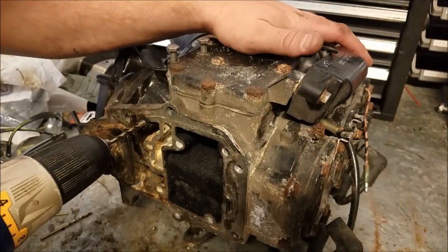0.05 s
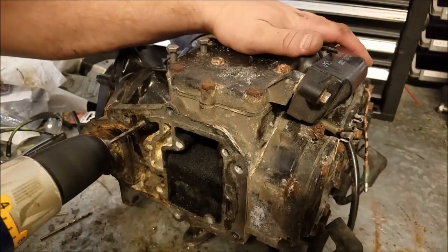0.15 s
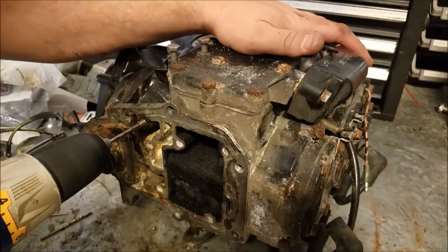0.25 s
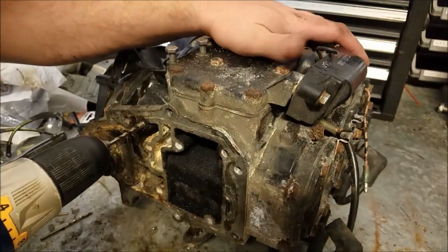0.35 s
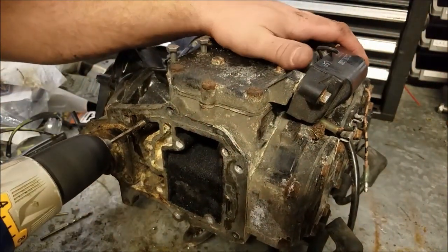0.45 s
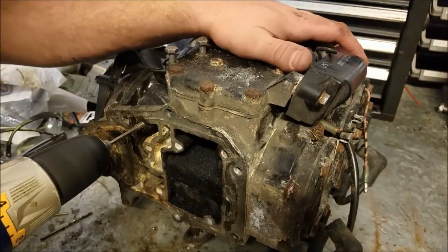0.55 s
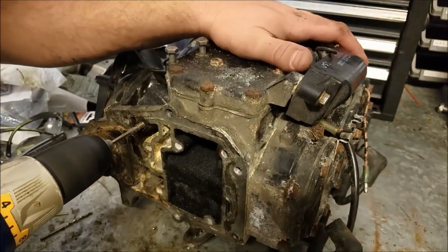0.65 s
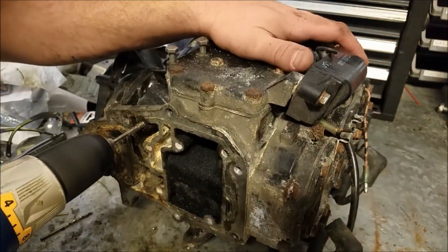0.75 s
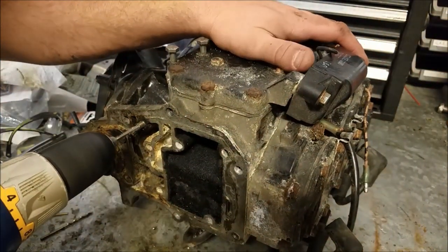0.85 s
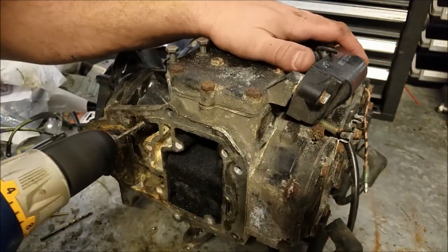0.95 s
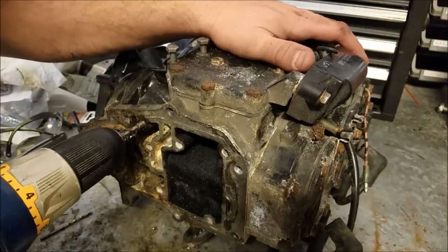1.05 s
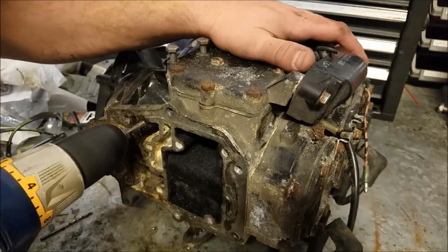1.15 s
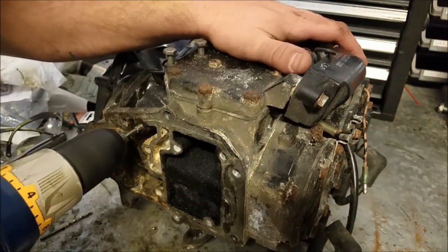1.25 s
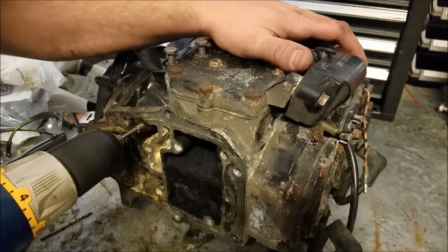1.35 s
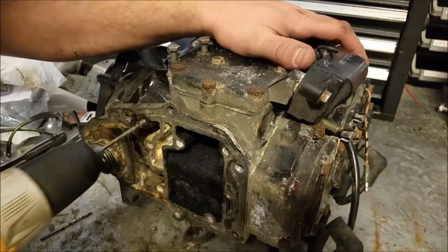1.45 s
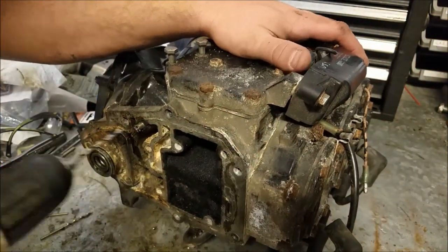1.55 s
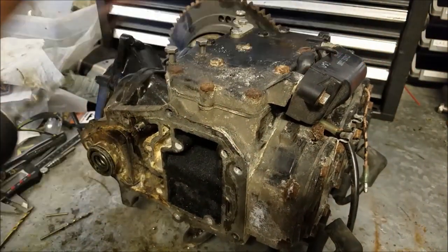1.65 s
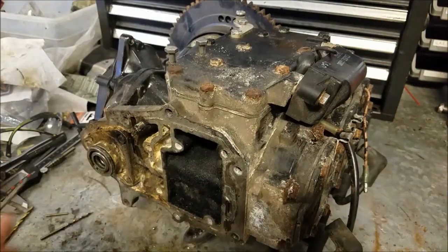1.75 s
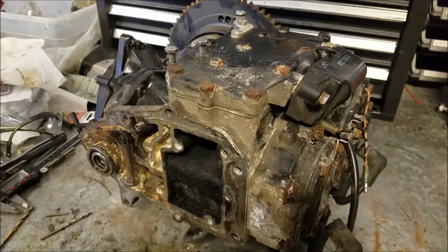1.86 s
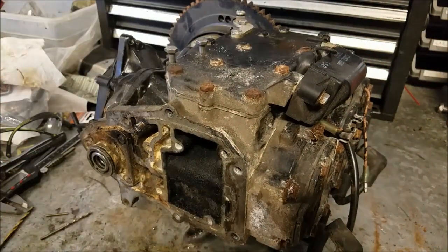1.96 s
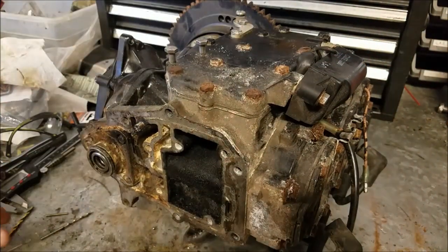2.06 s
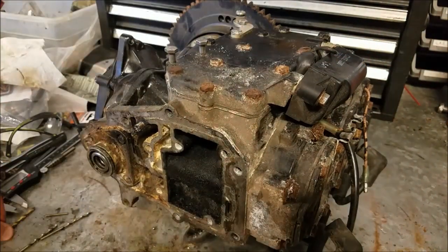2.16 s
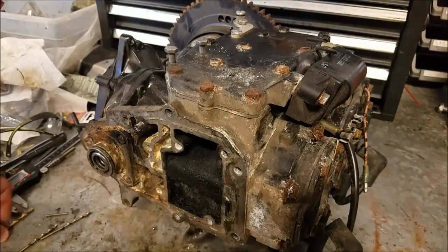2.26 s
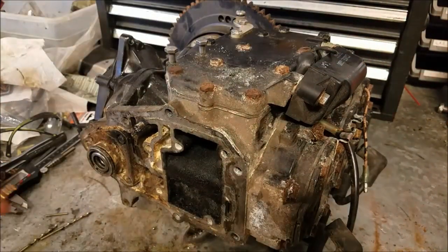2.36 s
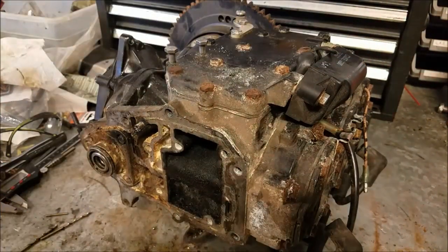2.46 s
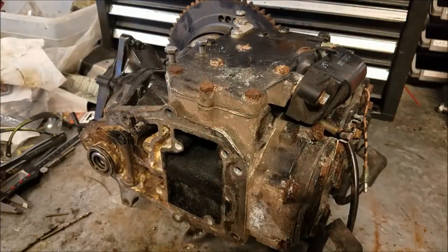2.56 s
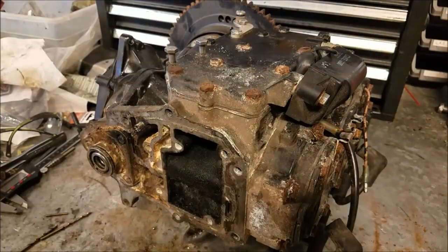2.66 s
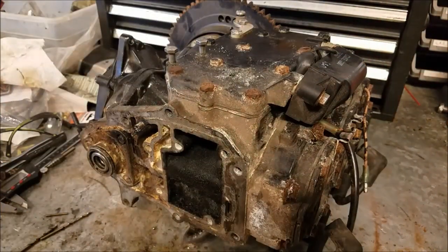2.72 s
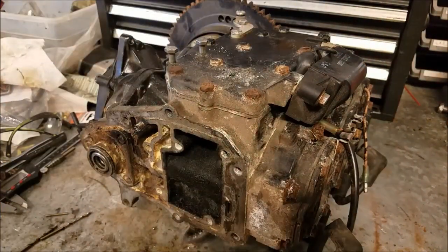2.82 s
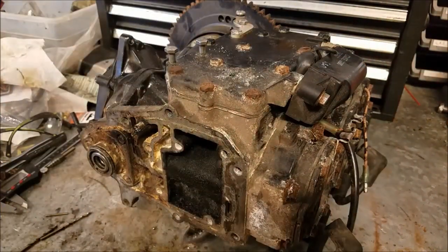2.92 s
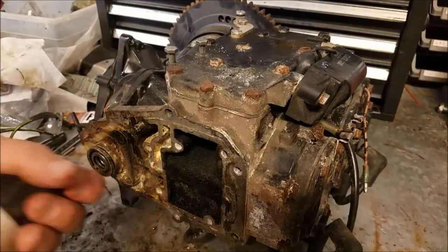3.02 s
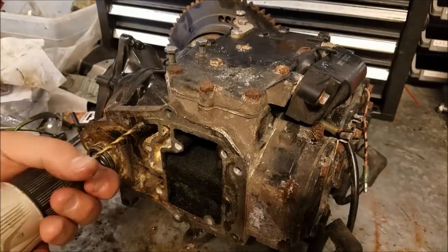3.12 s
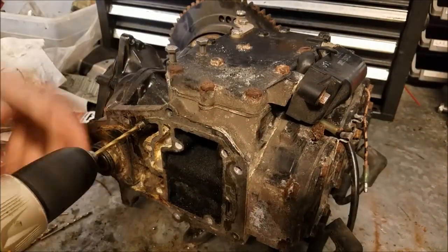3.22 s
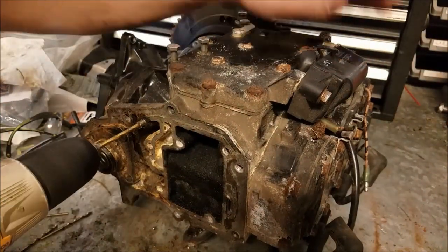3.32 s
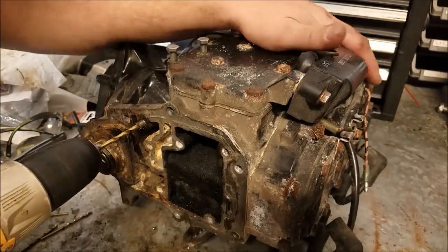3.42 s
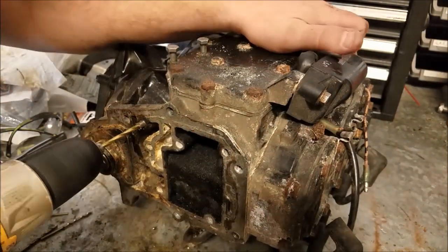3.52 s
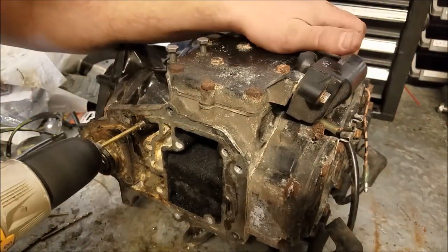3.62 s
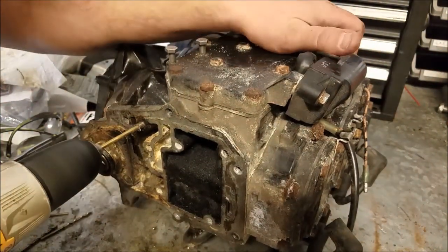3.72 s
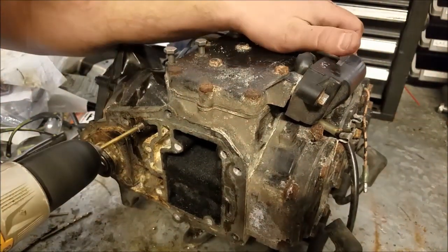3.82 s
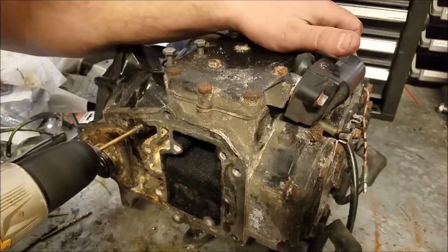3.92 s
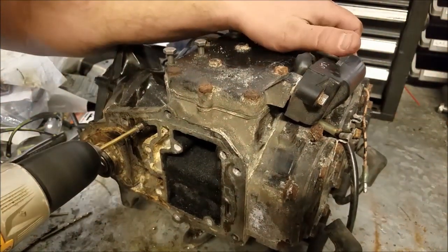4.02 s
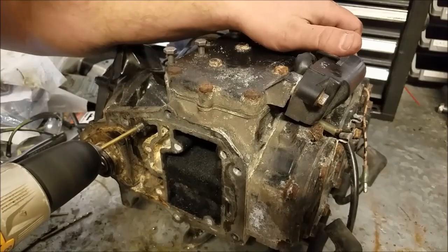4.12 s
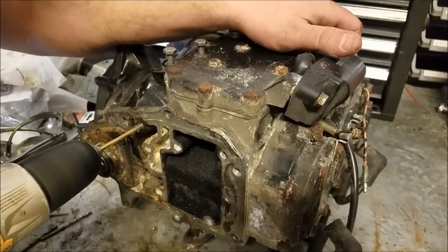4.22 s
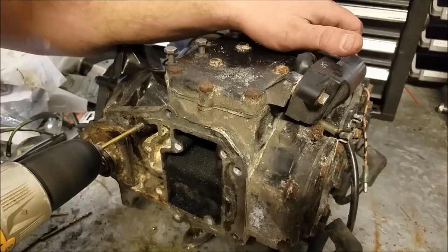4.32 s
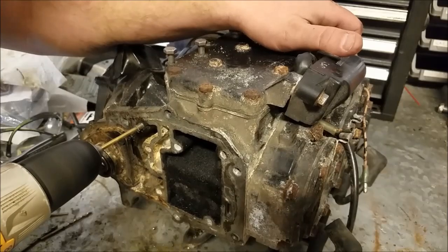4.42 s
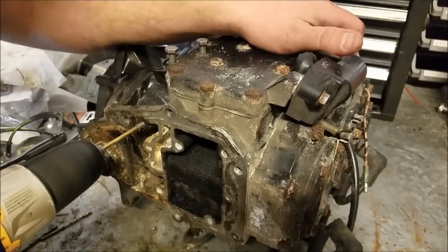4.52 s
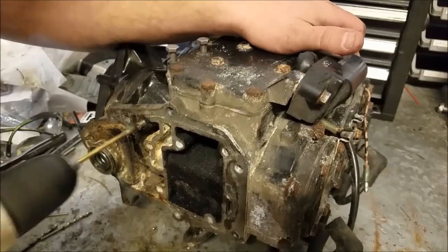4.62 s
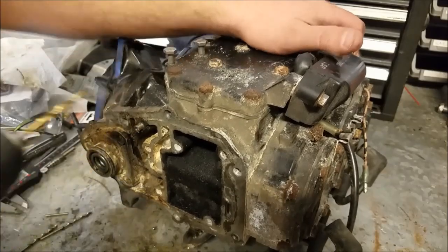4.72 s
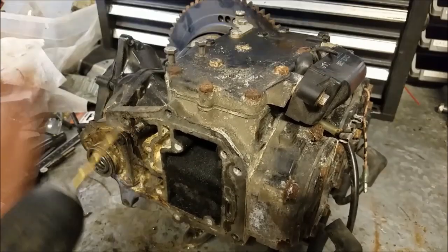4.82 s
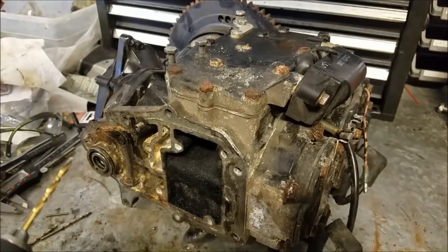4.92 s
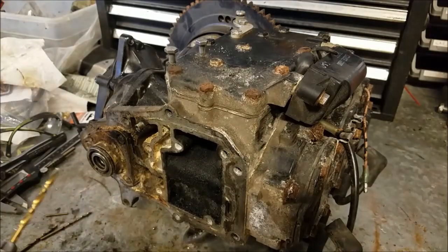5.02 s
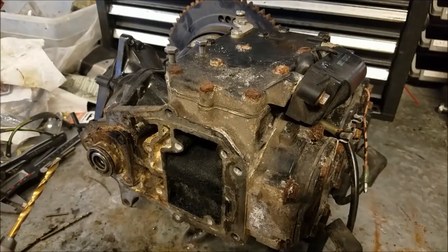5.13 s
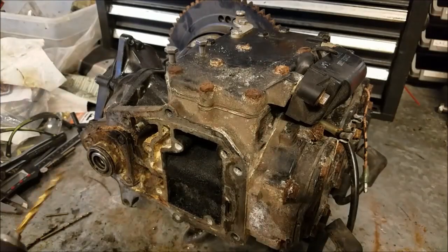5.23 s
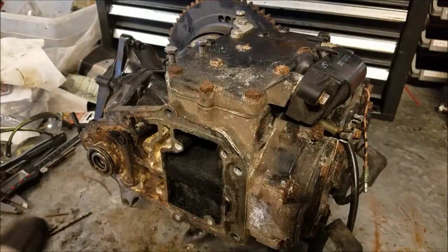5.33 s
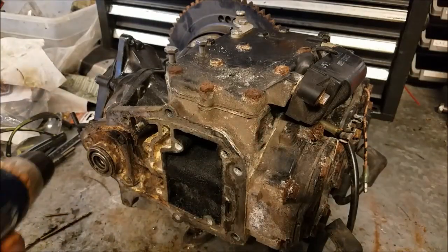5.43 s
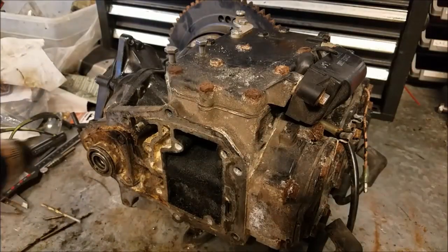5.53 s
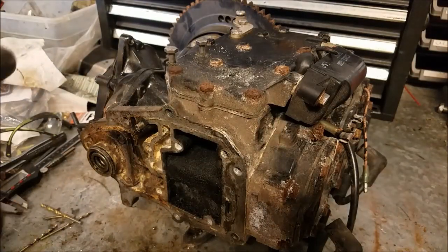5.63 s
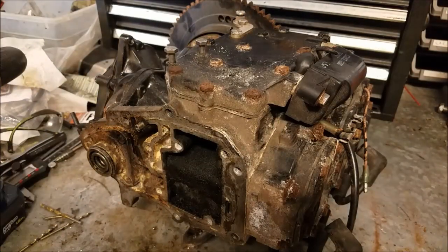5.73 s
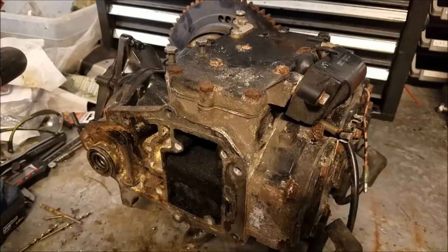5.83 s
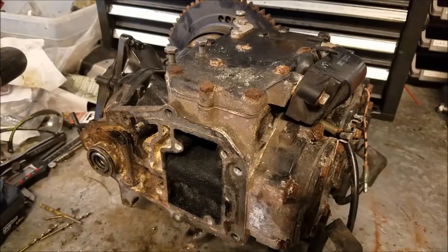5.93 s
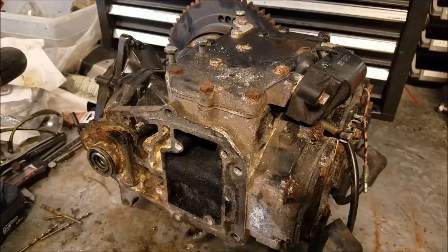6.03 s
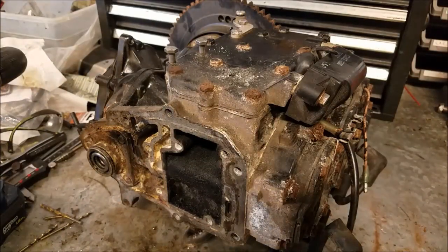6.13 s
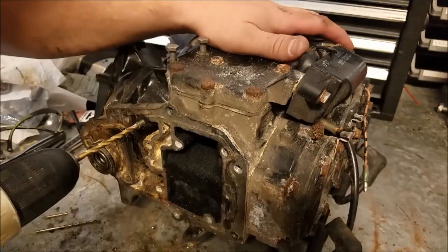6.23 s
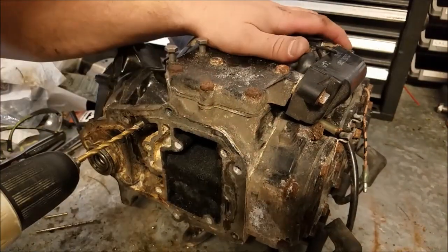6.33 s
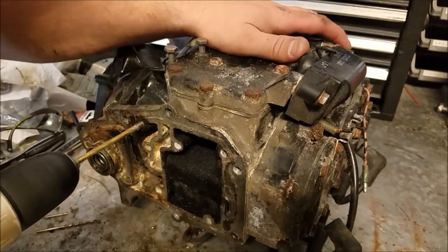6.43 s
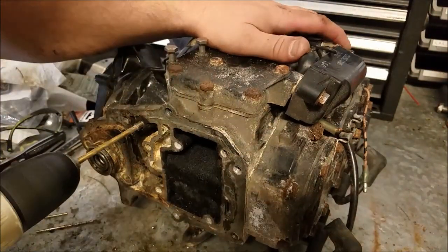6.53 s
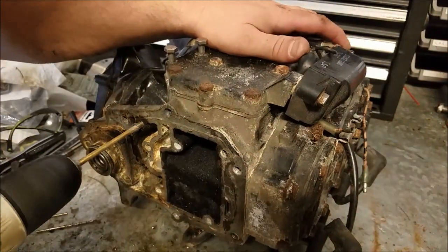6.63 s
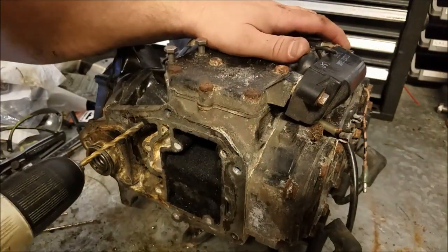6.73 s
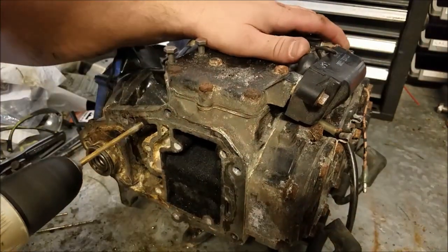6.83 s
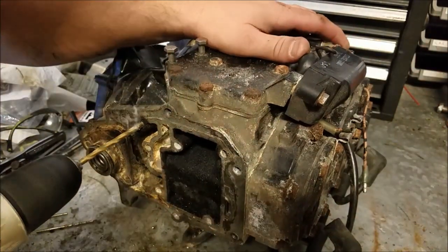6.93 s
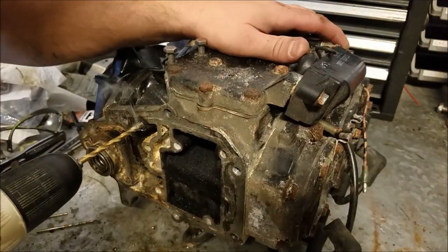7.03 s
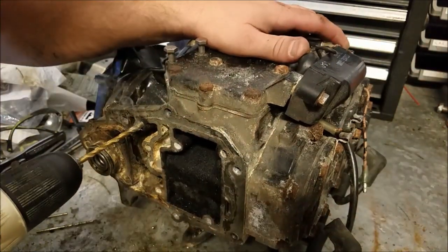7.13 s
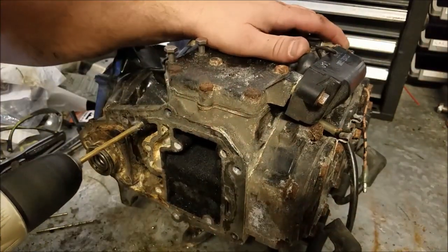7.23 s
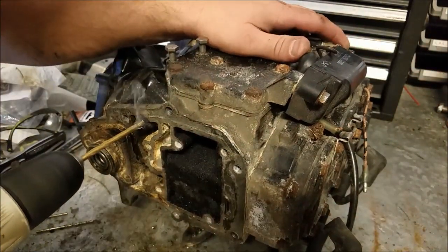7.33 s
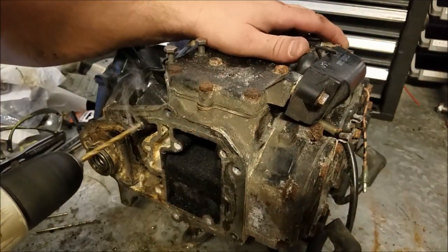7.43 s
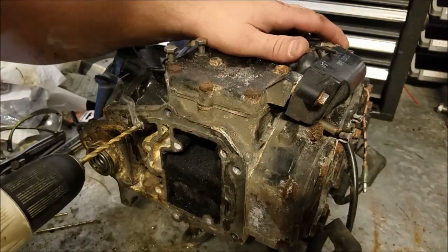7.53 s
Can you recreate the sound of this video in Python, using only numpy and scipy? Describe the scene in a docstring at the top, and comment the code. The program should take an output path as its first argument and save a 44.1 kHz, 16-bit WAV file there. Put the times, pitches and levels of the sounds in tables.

```python
"""Cordless drill in a garage

A drill works into a cast metal housing close to a two-port microphone. In each burst the motor and
gear teeth whine at multiples of the shaft speed, the gears rasp and the bit excites the resonances
of the casting. Trigger, clutch and bit click, and the tool knocks on the bench. Behind it a fan hums,
an engine revs past outside and a short hoot sounds."""
import sys
import numpy as np
from scipy import signal
from scipy.fft import rfft, irfft, next_fast_len
from scipy.io import wavfile
from scipy.ndimage import uniform_filter1d

SR = 44100
rng = np.random.default_rng(int(sys.argv[2]) if len(sys.argv) > 2 else 0)


def inscribe(sig):
    """Save sig as 16-bit PCM at rate SR to the path in sys.argv[1].

    A 1-D sig is mono; a 2-D sig holds one channel per row.
    Samples are clipped to [-1, 1] before scaling.
    """
    pcm = np.round(np.clip(np.atleast_2d(sig).T, -1, 1) * 32767)
    wavfile.write(sys.argv[1], SR, pcm.astype(np.int16))


N = 333837
T = np.arange(N) / SR


def undb(db):
    """Amplitude ratio of a level in dB."""
    return 10 ** (np.asarray(db) / 20)


def level(x, db=0):
    """Scaling to an rms level."""
    return x * undb(db) / np.sqrt(np.mean(x ** 2))


def butter(x, order, hz, kind="low", apply=signal.sosfilt):
    """Maximally flat filter, causal by default."""
    return apply(signal.butter(order, hz, kind, fs=SR, output="sos"), x)


def colour(x, points):
    """Spectral shaping by (f/Hz, level/dB) points on a logarithmic frequency axis."""
    hz, db = np.transpose(points)
    size = next_fast_len(N)
    f = np.maximum(np.arange(size // 2 + 1) * SR / size, 1)
    gain = undb(np.interp(np.log(f), np.log(hz), db, left=-70, right=-70))
    return irfft(rfft(x, size) * gain, size)[..., :N]


def resonate(x, hz, width_hz):
    """Forced response of a two-pole resonator, scaled to unit rms."""
    return level(signal.lfilter(*signal.iirpeak(hz, hz / width_hz, fs=SR), x))


def walk(rate):
    """Slow random fluctuation: values held for 1 / rate s and smoothed twice; spread near 1."""
    k = int(SR / rate)
    steps = np.repeat(rng.standard_normal(N // k + 1), k)
    return 1.256 * uniform_filter1d(uniform_filter1d(steps, k), k)[:N]


def envelope(tables, column):
    """Amplitude envelope from one level column of timed tables; silent outside them."""
    out = np.zeros(N)
    for rows in map(np.array, tables):
        on = (T >= rows[0, 0]) & (T <= rows[-1, 0])
        out[on] = undb(np.interp(T[on], rows[:, 0], rows[:, column]))
    return uniform_filter1d(out, size=88)


def ring(modes):
    """Impulse response as a sum of damped modes, peak 1."""
    t = np.arange(int(.12 * SR)) / SR
    y = sum(undb(db - 60 * t / t60) * np.sin(2 * np.pi * hz * t) for hz, db, t60 in modes)
    return y / np.abs(y).max()


def add(out, s, x):
    """Superposition of a short sound at time s."""
    i = int(s * SR)
    out[i:i + len(x)] += x[:len(out) - i]


def grit(scatter_db):
    """Impulsive noise: dense tiny impacts of uneven size."""
    return rng.standard_normal(N) * undb(scatter_db * np.minimum(rng.exponential(size=N), 4.5))


def room(x, t60_s, wet_db):
    """Diffuse reverberation: a separate tail at each port, its treble decaying faster."""
    t = np.arange(int(.3 * SR)) / SR
    noise = rng.standard_normal((2, len(t))) * np.minimum(t / .0019, 1)
    low = butter(noise, 1, 5000)
    decay = undb(-60 * t / t60_s)
    tail = low * decay + (noise - low) * decay ** 4
    tail *= undb(wet_db) / np.sqrt(np.sum(tail ** 2) / 2)
    return signal.fftconvolve(x[None], tail, axes=1)[:, :N]


def garage():
    """Ambient noise, largely coherent between the ports except in the treble."""
    # room noise spectrum: f/Hz, relative level/dB
    spectrum = [(18, -74), (30, -25), (103, -17.5), (309, -14), (371, -8.5), (521, -12), (626, -10),
                (695, -19), (752, -14.5), (1340, -14.5), (1450, -17.5), (2320, -18), (4710, -22),
                (15700, -35)]
    mid, side = level(colour(rng.standard_normal((2, N)), spectrum), -50.5) * undb(.32 * walk(4.5))
    side = colour(side, [(20, -8), (100, -11), (300, -8), (800, -10.5), (2000, -8), (4500, .8),
                         (16000, -1.5)])
    return np.array([mid + side, mid - side])


def fan():
    """Narrow-band noise is heard as the wavering tones of a fan."""
    # spectral lines: f/Hz, bandwidth/Hz, level/dB
    lines = [(378.2, 10.6, -59), (508.3, 22, -61.5), (737.5, 6.7, -61.5), (246.7, 5.6, -64.5)]
    return sum(undb(db) * resonate(rng.standard_normal(N), hz, width) for hz, width, db in lines)


def hum():
    """Amplitude modulation of a low noise band: a hum that swells now and then."""
    # swells: centre t/s, half width/s, level/dB
    swells = [(6.1, 0.31, -58.5), (6.7, 0.067, -45), (6.94, 0.14, -56.5), (7.31, 0.051, -49)]
    gain = sum(undb(db) * np.exp(-((T - s) / width) ** 2) for s, width, db in swells)
    return gain * resonate(rng.standard_normal(N), hz=248, width_hz=16)


def harmonic_tone(rows, second, third):
    """Three harmonics of a gliding fundamental, unsteady in phase and level."""
    s, hz, _ = np.transpose(rows)
    phase = 2 * np.pi * np.cumsum(np.interp(T, s, hz) * (1 + .01234 * walk(50))) / SR
    tone = np.sin(phase) + second * np.sin(2 * phase + 1.12 * walk(72))
    tone += third * np.sin(3 * phase + 2 * walk(75))
    return np.sqrt(2) * tone * undb(2.95 * walk(40)) * envelope([rows], column=2)


def engine():
    """Periodic firing gives a harmonic series; a broadband roar swells and fades with it."""
    # engine outside: t/s, firing f/Hz, level/dB
    revs = [(4.9, 260.6, -76), (4.97, 279.8, -55), (5.17, 332.4, -49.5), (5.24, 286.3, -57),
            (5.324, 290, -52), (5.572, 440.5, -44), (5.66, 420, -57), (5.85, 423, -52.5), (5.95, 428, -62)]
    tone = harmonic_tone(revs, second=.25, third=.12)
    roar = colour(rng.standard_normal(N), [(250, 10.5), (600, 1), (1300, -5), (3000, -19), (7000, -6)])
    return tone + level(roar, -52.5) * np.exp(-((T - 5.5) / .26) ** 2)


def hoot():
    """A short low tone, nearly pure because its overtones are weak."""
    # course of the hoot: t/s, f/Hz, level/dB
    glide = [(6.135, 438, -62), (6.147, 439, -41), (6.163, 401, -34.5), (6.173, 393.5, -46),
             (6.228, 402, -33)]
    return harmonic_tone(glide, second=.08, third=.05)


def knocks():
    """Impact excitation: the drill strikes the bench with a crack, and the top rings in its modes."""
    # blows: t/s, level/dB
    blows = [(5.551, -22), (5.586, -22.5), (5.732, -16.5), (5.754, -18.5), (5.768, -16.5)]
    # bench modes: f/Hz, relative level/dB, T60/s
    modes = [(604, -2.5, 0.19), (950, -19, 0.028), (1034.7, 14, 0.013), (1427, 1, 0.011),
             (1655, -18, 0.024), (2024, 7.5, 0.019), (2740, -7, 0.016)]
    out, t = np.zeros(N), np.arange(SR // 20) / SR
    for s, db in blows:
        crack = rng.standard_normal(len(t)) * np.exp(-t / .0074)
        add(out, s, undb(db) * ring(modes))
        add(out, s, .35 * undb(db) * crack)
    return out


def clicks():
    """Brief contact of small hard parts gives a treble crack and sets the plastic body vibrating."""
    # trigger, clutch and bit clicks: t/s, crack level/dB, relative ring level/dB
    contacts = [(0.0379, -20, -36), (0.0908, -8, -52), (0.1264, -24, -60), (0.2054, -18.5, -44),
                (0.2808, -16.5, -60), (0.327, -13, -46), (0.416, -15, -52), (0.47, -16.5, -33.5),
                (1.0794, -22, -32), (1.1416, -16.5, -33.5), (1.5707, -14, -30), (1.67, -18, -63),
                (1.7822, -24, -71), (1.7878, -29, -68), (1.8168, -26, -61), (1.8404, -23, -37.5),
                (1.921, -7.5, -32), (2.135, -17.5, -57), (2.1454, -30, -56), (2.2042, -17, -64),
                (2.345, -37, -57), (2.595, -37, -67), (2.6955, -30, -68), (2.7776, -25.5, -62),
                (2.8381, -18.5, -58), (2.9308, -18, -59), (2.963, -23, -60), (2.9911, -13, -54),
                (3.2774, -24.5, -50), (3.429, -13, -50), (3.5009, -14, -33), (3.5654, -23, -37),
                (3.5993, -18, -32), (4.722, -10, -55), (4.855, -29, -70), (4.8606, -21.5, -61),
                (4.955, -19.5, -59), (5.0472, -19.5, -67), (5.079, -31, -66), (5.2743, -10, -30),
                (5.3044, -12, -36), (5.4409, -32, -59), (5.5077, -34, -64), (6.2376, -17.5, -33),
                (6.3084, -13.5, -31), (6.3818, -15, -35), (6.4441, -15, -29.5), (6.5282, -14, -38),
                (6.5817, -12, -29.5), (6.764, -15, -28.5), (6.8356, -12.5, -29.5), (6.9895, -21, -38.5),
                (7.064, -19, -36), (7.1128, -17.5, -35)]
    # drill body modes: f/Hz, relative level/dB, T60/s
    modes = [(2150, 0, .018), (1550, -9, .014), (2700, -7, .012)]
    rise_s, ring_gain_db = .0005, 8.5
    out, t = np.zeros(N), np.arange(SR // 20) / SR
    shape = t / rise_s * np.exp(1 - t / rise_s) + .041 * np.exp(-t / .003)  # snap, then rattle
    cracks = butter(rng.standard_normal((len(contacts), len(t))) * shape, 3, 2500, "high")
    cracks = .5 * cracks + butter(cracks, 1, 6000)
    grips = 1 + .039 * rng.standard_normal(len(contacts))  # the hand detunes the body each time
    for (s, db, ring_db), crack, grip in zip(contacts, cracks, grips):
        body = ring([(hz * grip, mode_db, t60) for hz, mode_db, t60 in modes])
        add(out, s, undb(db) * crack / np.abs(crack).max())
        add(out, s + rise_s, undb(ring_db + ring_gain_db) * body)
    return out


def sizzle():
    """Fine chips tearing off radiate high treble noise, incoherent between the ports."""
    # hard bite of the flutes: t/s, level/dB
    bite = [(3.62, -28), (3.72, -32), (3.94, -25), (4.292, -34), (4.56, -30), (4.58, -44)]
    chips = np.array([grit(1.63), grit(2.65)])
    hiss = colour(chips, [(13700, -25), (14100, -3), (14800, 4), (15500, 3), (16000, -4)])
    return level(hiss) * envelope([bite], column=1)


def pulls():
    """Trigger pulls in time order: rows (t/s, shaft f/Hz, rasp, drone, chatter/dB) and a whine mix."""
    # long pulls, one table each: t/s, shaft f/Hz, rasp level/dB, chatter level/dB
    runs = [
        [(.469, 451.6, -36.5, -33), (.555, 600, -36, -56), (.585, 958, -29, -45), (.61, 1046, -29, -48),
         (.68, 1033, -29.5, -39), (.742, 695.5, -34.5, -45)],
        [(.7421, 699.8, -36, -36), (.775, 908, -31.5, -41), (.81, 1006, -30.5, -38), (.975, 981.5, -30, -42),
         (1.0, 923, -31, -47), (1.033, 816, -29.5, -32), (1.063, 966, -33, -53), (1.088, 892, -32, -45)],
        [(1.142, 757, -39, -43), (1.187, 901, -29, -40), (1.245, 878, -33.5, -42), (1.265, 769, -32, -30),
         (1.296, 919, -32, -40), (1.318, 992, -30, -49), (1.452, 1031, -30.5, -50), (1.541, 1122, -30.5, -47),
         (1.578, 1040, -30, -35)],
        [(3.6, 900, -41, -33), (3.625, 900, -29.5, -38), (3.674, 1008, -29.5, -34), (3.72, 971, -28.5, -29),
         (3.826, 990, -30.5, -28.5), (4.0, 944, -30, -26.5), (4.146, 897.5, -29, -26), (4.335, 854, -30, -30.5),
         (4.535, 892, -32, -31), (4.59, 917, -35, -46), (4.652, 962, -36, -59), (4.694, 1021, -34, -53),
         (4.73, 950, -33, -39)],
        [(7.228, 747, -35.5, -40), (7.254, 713, -33.5, -40), (7.275, 762.5, -32, -40), (7.318, 728, -31.5, -38),
         (7.353, 651.5, -34, -32.5), (7.433, 780, -31, -40), (7.515, 705, -33.5, -39)],
        [(6.583, 579.6, -36.5, -45), (6.63, 678, -33.5, -44), (6.675, 768.5, -33, -44),
         (6.745, 813.5, -31, -37), (6.772, 769, -35.5, -34)],
    ]
    # levels re rasp per long pull: drone/dB, shaft/dB, first gear/dB, second gear/dB, commutator/dB
    mixes = [(-5, -9, -8, -5, -2.5), (-5.5, -8.5, -2, 0, -4), (-4, -11, -4, -1.5, -4.5),
             (-3, -9.5, -18, -7.5, -4), (-4.5, -10, -25, -3.5, -0.5), (-0.5, -12.5, -20, -6, -1)]
    # short pulls: start t/s, end t/s, top shaft f/Hz, first and last rasp level/dB,
    # drone and chatter level/dB re rasp
    squeezes = [(0.033, 0.092, 299.6, -35.5, -42, -2.5, -7), (0.194, 0.261, 297.7, -38, -43.5, -1.5, -12),
                (0.263, .422, 348.7, -35.5, -38, -4, -4), (1.861, 1.924, 301, -40.5, -39, -5, -12),
                (2.775, 2.886, 250.7, -43.5, -52, -3, -4), (2.989, 3.018, 308, -21, -31, -6, -3.5),
                (3.275, 3.431, 298.7, -45.5, -38, -5.5, -8), (3.507, 3.57, 300, -41.5, -39.5, -3.5, -4),
                (5.265, 5.312, 299, -29, -39.5, -10, -2), (5.733, 5.773, 248.8, -47, -49, 15, 7),
                (6.308, 6.387, 661.5, -38.5, -34.5, 0.5, -6), (6.445, 6.54, 722, -37.5, -34.5, -0.5, -11),
                (6.836, 6.945, 792, -30, -35, -0.5, -5.5), (6.984, 7.06, 884.7, -36.5, -33, -3, -6),
                (7.113, 7.183, 726, -32, -32, -3.5, -7)]
    # levels re rasp in short pulls: shaft/dB, first gear/dB, second gear/dB, commutator/dB
    squeeze_mix = (-16, -22, -12, -2)
    speed_curve = ((0, .76), (.31, .94), (.62, 1), (1, .85))  # shares of duration and of top speed
    out = [([(s, hz, db, db + mix[0], bit) for s, hz, db, bit in rows], mix[1:])
           for rows, mix in zip(runs, mixes)]
    for start, end, top_hz, first, last, drone, bit in squeezes:
        points = [(start + k * (end - start), v * top_hz, first + k * (last - first))
                  for k, v in speed_curve]
        out.append(([(s, hz, db, db + drone, db + bit) for s, hz, db in points], squeeze_mix))
    return sorted(out, key=lambda pull: pull[0][0][0])


def backlash(tables):
    """Gear backlash: after a pause the gain rises as the teeth take up their slack."""
    slack_s = .012
    ends = [-1] + [rows[-1][0] for rows in tables]
    starts = np.array([rows[0][0] for rows, end in zip(tables, ends) if rows[0][0] - end > slack_s])
    since = T - starts[np.maximum(np.searchsorted(starts, T) - 1, 0)]
    return np.clip(since / slack_s, .25, 1)


def grinding_gains(tables):
    """Envelopes of rasp, drone and chatter: steady running and sudden jolts add in power."""
    # the clutch grabs, the brake bites or a bit is knocked: t/s, rasp, drone and chatter level/dB
    jolts = [(0.089, -18, -28, -24), (0.127, -47, -39, -46), (0.205, -37, -33, -43), (0.417, -42, -38, -43),
             (1.081, -41, -44, -33), (1.574, -22, -32, -23), (1.839, -34, -38, -37),
             (1.92, -39, -39, -28.5), (2.136, -28.5, -33, -33), (2.837, -43, -58, -38),
             (2.921, -39, -43, -34), (2.93, -24, -28, -25), (3.278, -37, -38.5, -43),
             (3.429, -32, -35, -42), (3.501, -34, -45, -34), (3.6, -26, -46, -28), (4.724, -19.5, -29, -29),
             (5.552, -24.5, -18.5, -26.5), (5.583, -25.5, -22, -32), (5.733, -52, -19, -35),
             (6.237, -30, -37, -32), (6.307, -30, -40, -44), (6.444, -29.5, -48, -38),
             (6.583, -31, -46, -29.5), (6.766, -32, -41, -31), (7.235, -30, -33, -43)]
    jolt_s, fall_db = .022, 33.5
    decays = [[row, (row[0] + jolt_s, *(np.array(row[1:]) - fall_db))] for row in jolts]
    slack = backlash(tables)
    return [np.hypot(envelope(tables, k + 1) * slack, envelope(decays, k)) for k in (1, 2, 3)]


def hollows(x):
    """Comb filtering: reflections in the hollow casting form notches that move as the tool shifts."""
    # reflections: delay/s, drift/s, relative level/dB
    paths = [(.0021, 0.00024, -6.5), (.0047, .0003, -3), (.0083, .0004, -5.5)]
    reflected = sum(undb(db) * np.interp(T - lag - drift * walk(12), T, x) for lag, drift, db in paths)
    return (x + reflected) / np.sqrt(1 + sum(undb(2 * db) for _, _, db in paths))


def linger(gain):
    """Echo envelope: reflected energy decays exponentially."""
    power = 0
    for t60_s, db in ((.011, 0), (.15, -5)):  # bench and floor, then walls
        pole = undb(-120 / (t60_s * SR))
        power = power + undb(2 * db) * signal.lfilter([1 - pole], [1, -pole], gain ** 2)
    return undb(1) * np.sqrt(power)


def grinding(throb, chuck_angle, gains):
    """Forced vibration under tiny impacts: gears rasp, the housing drones, the bit chatters."""
    # gear rasp spectrum: f/Hz, relative level/dB
    rasp_spectrum = [(1760, -38), (3000, -6), (3400, -14), (4040, -2.5), (4450, -3), (4870, 0.5), (5790, 1),
                     (8780, -2), (10700, -1.5), (12800, -3.5), (14100, -3.5), (15700, -1.5)]
    # housing drone spectrum: f/Hz, relative level/dB
    drone_spectrum = [(260, -71), (450, -61), (578, -0.5), (637, -7.5), (963, -7), (1390, -3.5),
                      (1510, -0.5), (2230, 1.5), (3710, 3), (4500, 2.5), (5850, -13), (9900, -120)]
    # resonances of the casting: f/Hz, bandwidth/Hz, relative level/dB
    casting = [(2326, 40, -6.5), (2490, 51, -8), (3750, 240, -1), (5340, 980, 1), (6630, 240, -0.5),
               (6840, 140, 0.5), (7124, 430, 4.5), (7860, 200, 1.5), (8360, 90, -17.5)]
    chips = grit(6.4)
    chatter = sum(undb(db) * resonate(chips, hz, width) for hz, width, db in casting)
    # tooth flaws recur on every turn of the chuck: a comb of partials that follows the speed
    turn = chuck_angle / (2 * np.pi) % 1
    flaws = np.interp(turn, np.linspace(0, 1, 240), rng.standard_normal(240), period=1)
    rasp = colour(grit(2.83), rasp_spectrum)
    drone = colour(level(grit(.94)) + .81 * flaws, drone_spectrum)
    chatter *= undb(1.1 * walk(120))
    layers = level(rasp * throb, -.021), level(drone * throb, -3.27), level(chatter * throb)
    return sum(x * gain for x, gain in zip(layers, gains))


def whine(tables, mixes, shaft_hz, shaft_angle, chuck_angle):
    """Rotational orders: shaft, gears and commutator radiate tones at multiples of the shaft speed."""
    # orders, f / shaft f: shaft, first gear, second gear, commutator
    orders = [1, 8.9, 11.26, 12.04]
    # transmission through the drill housing: f/Hz, level/dB
    housing = [(400, -40), (700, -4), (960, -0.5), (1150, 3.5), (4500, -43), (6300, -13), (6900, 2.5),
               (7600, -8), (8200, 1.5), (9100, -2), (9500, -5.5), (10100, -1.5), (10700, -11), (11300, -9),
               (11700, -2), (12400, -4), (13600, -3)]
    housing_hz, housing_db = np.transpose(housing)
    # a harder bite (chatter re rasp) raises the gear tones and lowers the commutator; slopes in dB/dB
    bite_slopes, usual_db = (.013, .25, .26, -.6), -10.5
    gains = []
    for k, (order, slope) in enumerate(zip(orders, bite_slopes)):
        levels = [[(s, rasp + mix[k] + slope * (bit - rasp - usual_db)) for s, _, rasp, _, bit in rows]
                  for rows, mix in zip(tables, mixes)]
        transmission = undb(np.interp(np.log(order * shaft_hz), np.log(housing_hz), housing_db))
        gains.append(envelope(levels, column=1) * transmission)
    # load on the first gear brings out the octave of the shaft
    out = .44 * np.sin(2 * shaft_angle + .5 * walk(120)) * gains[1]
    for order, gain in zip(orders, gains):
        # teeth meet unevenly, so higher orders flutter more and carry sidebands of the chuck
        wobble = .125 * walk(250) + .016 * np.sin(chuck_angle)
        flutter = undb(1.1 * walk(90) + order ** .5 * walk(25))
        out += np.sin(order * (shaft_angle + wobble)) * flutter * gain
    return out


def drill():
    """One rotating shaft modulates the grinding and its echo and sets the pitch of the whine."""
    gear_ratio, coherent_below_hz = 13, 600
    tables, mixes = zip(*pulls())
    rows = np.concatenate(tables)
    shaft_hz = np.interp(T, rows[:, 0], rows[:, 1])
    shaft_angle = 2 * np.pi * np.cumsum(shaft_hz * (1 + .00296 * walk(60))) / SR
    chuck_angle = shaft_angle / gear_ratio
    # a bent bit loads the gears once a turn, its two flutes twice
    load_db = .87 * np.sin(chuck_angle) + 1.2 * np.sin(2 * chuck_angle + walk(8.5))
    throb = undb(load_db + .99 * walk(45) + .98 * walk(130))
    gains = grinding_gains(tables)
    grind = hollows(grinding(throb, chuck_angle, gains))
    # the hand-held tool keeps shifting, so each port has its own echo, alike only in the long waves
    echo_gains = [linger(gain) for gain in gains]
    echo = np.array([grinding(np.sqrt(throb), chuck_angle, echo_gains) for port in "LR"])
    long_waves = butter(echo, 2, coherent_below_hz, apply=signal.sosfiltfilt)
    echo += long_waves[0] - long_waves
    return grind, echo, whine(tables, mixes, shaft_hz, shaft_angle, chuck_angle)


def scene():
    """Superposition at two ports: a path difference delays the right one. The level dips briefly once."""
    tool_lag, hit_lag = 4, 3  # samples; the hits come from further in front
    grind, echo, tones = drill()
    tool = grind + tones
    hits = butter(clicks() + knocks(), 2, 350, "high")
    left = undb(2.16) * (tool + hits)
    right = undb(.04) * (np.roll(tool, tool_lag) + np.roll(hits, hit_lag))
    out = np.array([left, right]) + echo + sizzle()
    out += room(hits, t60_s=.095, wet_db=-4)
    out += room(butter(tones, 2, 4000, "high"), t60_s=.051, wet_db=-.081)
    out += engine() + hoot() + hum() + garage() + fan()
    dip = (T > 6.228) & (T < 6.237)
    return out * (1 - .84 * uniform_filter1d(dip * 1., size=30))


def record(dry):
    """Level-dependent filtering: the bass of loud sound is lowered; the top is cut off."""
    threshold_db, window_s, top_hz = -30.5, .041, 15700
    power = uniform_filter1d(np.mean(dry ** 2, axis=0), int(window_s * SR))
    excess_db = np.maximum(10 * np.log10(power + 1e-12) - threshold_db, 0)
    for hz, slope in ((590, .62), (142, 2.2)):  # corner f/Hz, dB of cut per dB of excess
        low = butter(dry, 2, hz, apply=signal.sosfiltfilt)
        dry = dry + low * (undb(-slope * excess_db) - 1)
    bass_gain = undb([[-1.7], [1.4]])  # the left port hears less bass
    wet = dry + butter(dry, 1, 700) * (bass_gain - 1)
    return signal.sosfilt(signal.ellip(14, .3, 70, top_hz, fs=SR, output="sos"), wet)


dry = scene()
out = record(dry)
inscribe(out)
```